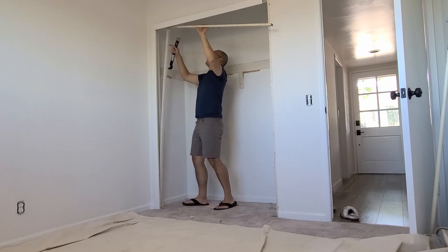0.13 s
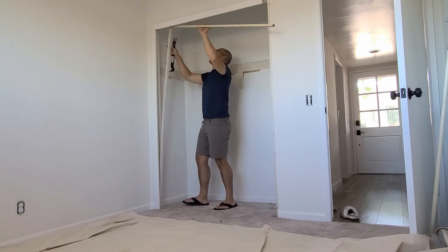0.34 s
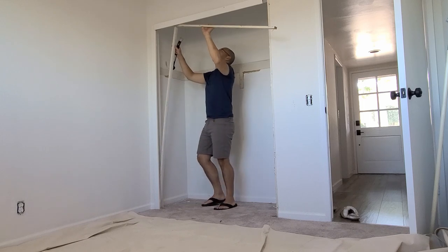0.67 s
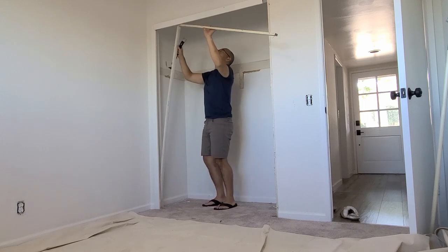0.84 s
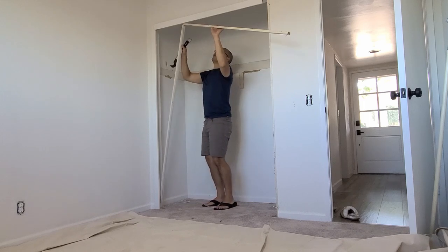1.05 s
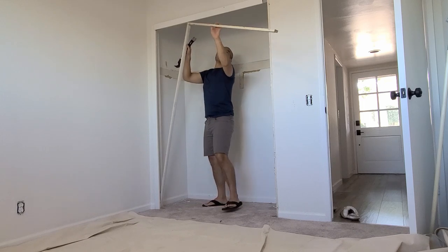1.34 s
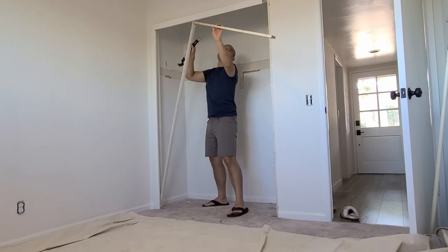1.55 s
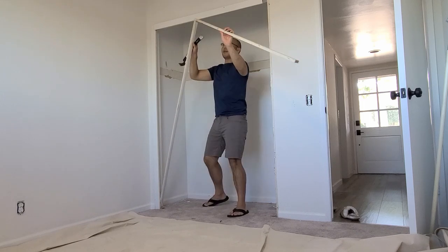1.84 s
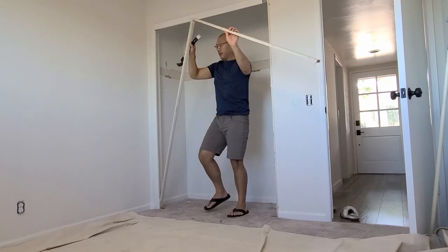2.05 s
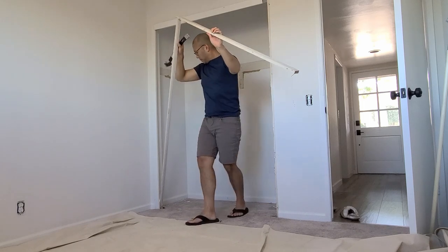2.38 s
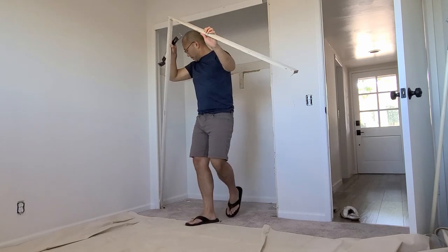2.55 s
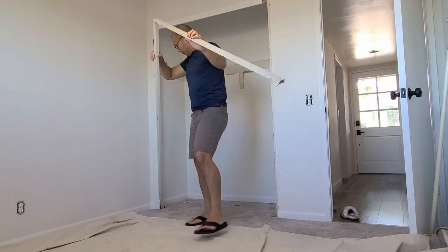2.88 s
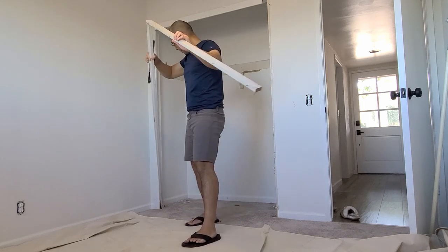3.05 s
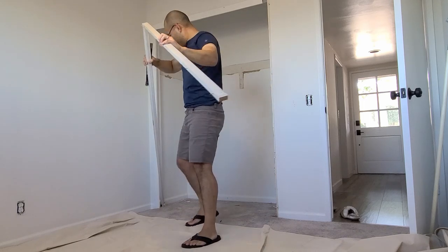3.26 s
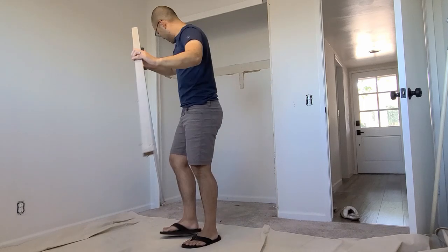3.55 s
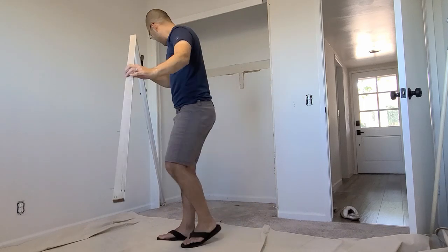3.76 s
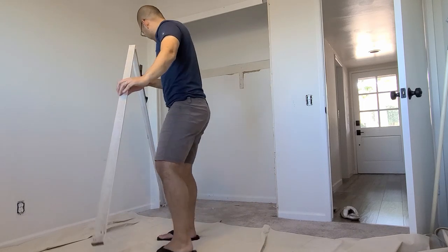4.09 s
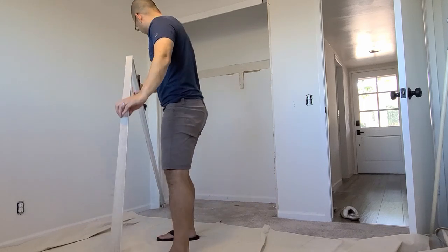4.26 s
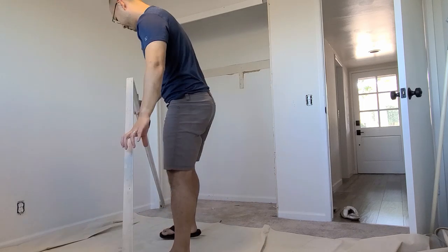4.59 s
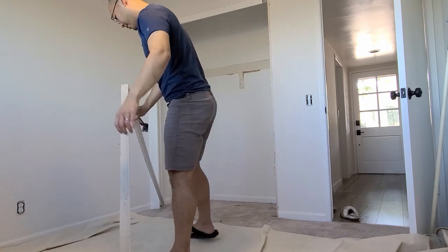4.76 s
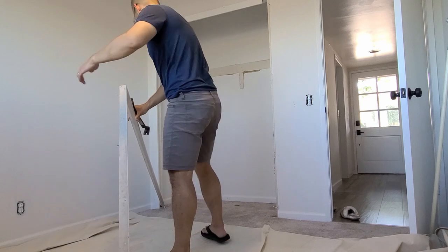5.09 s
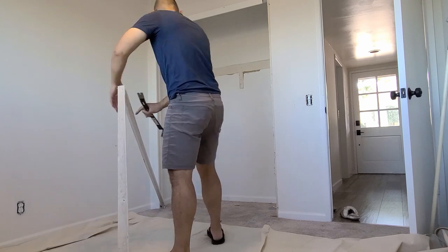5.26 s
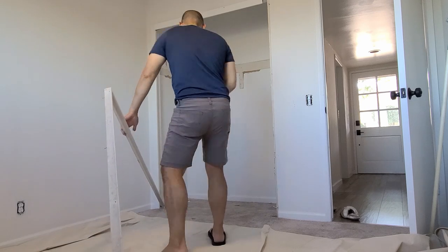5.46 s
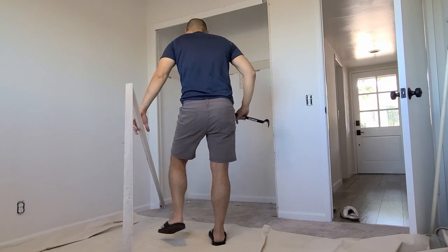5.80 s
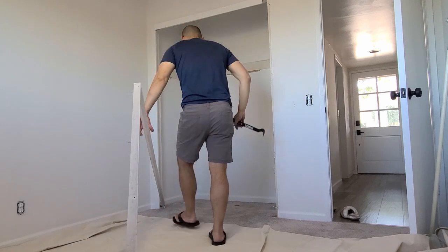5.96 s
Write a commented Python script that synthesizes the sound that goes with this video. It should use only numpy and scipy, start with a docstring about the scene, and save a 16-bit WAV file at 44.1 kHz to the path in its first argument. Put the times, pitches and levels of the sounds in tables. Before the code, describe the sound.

In a bare hard-walled room, a long wooden trim strip is pried free. After a near-quiet moment, bright cracks and scrapes burst out with low hollow wall booms, then faint creaks, a second cluster of snaps and thumps, cloth shuffles, and a solid wooden knock as the board meets the covered floor. A stereo microphone at room distance catches lively reflections, low rumble and slight hiss.

```python
"""Prying trim in a bare room

A long strip of painted wooden trim is worked loose from a hollow wall: paint and nails crack, the strip
knocks and scrapes, the wall booms, feet shuffle on a drop cloth. Runs of tiny slips ring the strip's modes,
pushes ring the wall's modes, and shaped noise makes cloth, house rumble and microphone hiss.
Hard walls put a bright tail on the wood, heard by a stereo microphone."""
import sys
import numpy as np
from scipy import signal
from scipy.fft import rfft, irfft, next_fast_len
from scipy.io import wavfile
from scipy.ndimage import uniform_filter1d, map_coordinates

SR = 44100
rng = np.random.default_rng(int(sys.argv[2]) if len(sys.argv) > 2 else 0)


def gain_from_decibels(decibels):
    """Convert decibel values to linear amplitude factors."""
    exponent = np.asarray(decibels, float) / 20
    return 10 ** exponent


def digitize_waveform(pressure):
    """Quantize a signal to 16-bit integers and store it at the path in sys.argv[1].

    Rows of a 2-D input are taken as channels; values are limited to [-1, 1].
    """
    field = np.atleast_2d(pressure).T
    bounded = np.clip(field, -1, 1)
    quanta = np.round(bounded * 32767).astype(np.int16)
    wavfile.write(sys.argv[1], SR, quanta)


N = 270330  # length in samples

# Microphone noise. Each row: frequency in Hz, relative level in dB per Hz.
HISS_SPECTRUM = [(300, 15), (2000, -11), (8000, -7), (16000, -3)]
# Low rumble of the house. Each row: frequency in Hz, relative level in dB per Hz.
HOUSE_SPECTRUM = [(13, -0.5), (22, 2), (80, 5.5), (93, 5), (103, -1.5), (157, -10.5), (184, -14.5),
                  (227, -4.5), (297, -10.5), (353, -38), (420, -34.5), (550, -47), (920, -120)]
# Grainy rustle of the drop cloth. Each row: frequency in Hz, relative level in dB per Hz.
CLOTH_SPECTRUM = [(180, -29.5), (300, 2), (800, 3), (1900, 1.5), (3400, -4), (7000, -11.5), (16000, -33)]
# Feet shifting on the cloth. Each row: peak time in seconds, rustle level in dB, weight on the floor in dB.
STEPS = [(0, -115, -46), (.3, -78, -61), (1.701, -58.5, -48.5), (2.3, -64, -54), (2.648, -54, -45.5),
         (3.65, -55, -45.5), (4.102, -61, -63.5), (5.149, -64.5, -72), (5.449, -54.5, -45),
         (5.669, -63, -73), (6.12, -71.5, -79)]

# Decay of the bare room. Each row: frequency in Hz, T60 in seconds.
ROOM_DECAY = [(200, 0.83), (1000, 0.41), (3000, 0.43), (7000, 0.36), (15000, 0.22)]
# Likeness of left and right at the microphone. Each row: frequency in Hz, correlation (no unit).
LEFT_RIGHT_LIKENESS = [(60, 0.98), (180, 0.94), (350, 0.75), (700, 0), (2000, 0.1), (10000, 0)]

# Modes of the hollow wall. Each row: frequency in Hz, relative level in dB, undamped T60 in seconds.
WALL_MODES = [(48.93, 3, 1), (56.54, 2, 1), (75.2, 1, 0.79), (86, -4, 0.68), (128, 7, 0.34),
              (157.9, -0.5, 0.55), (198, 1, 0.24), (233.2, 4.5, 0.26), (285.5, 6.5, 0.22),
              (310, -3.5, 0.55)]
# Pushes that shake wall and floor. Each row: start in seconds, level in dB, centre in Hz.
THUMPS = [(0.623, -32, 278), (0.627, -32, 49.6), (.69, -26, 86), (0.71, -26, 198), (0.828, -27.5, 49.3),
          (0.904, -21, 215), (0.927, -13.5, 55.6), (.99, -22, 148), (1.021, -26.5, 51), (1.113, -25.5, 56),
          (1.215, -32.5, 74), (1.269, -25, 50), (1.673, -45.5, 268), (1.913, -29.5, 128), (2.844, -22, 124),
          (2.85, -27.5, 303), (2.932, -17, 68), (3.009, -18, 64.5), (3.062, -27.5, 276), (3.089, -20, 76.4),
          (3.117, -23.5, 137), (3.173, -32.5, 72), (3.261, -36.5, 68.4),]
# The freed strip bumps the floor, deadened by the cloth. Each row: start in seconds, level in dB, centre in Hz.
FLOOR_BUMPS = [(3.598, -40.5, 192), (4.181, -37, 243), (4.566, -23, 91.3), (4.569, -24, 275),
               (4.651, -27.5, 198), (5.371, -60, 79), (5.398, -41, 250)]

# Modes of the wooden strip. Each row: frequency in Hz, width in Hz, relative level in dB.
STRIP_MODES = [(790, 70, 0), (970, 60, 0), (1210, 70, 0), (1340, 60, 0), (1595, 50, 2), (1950, 70, 0),
               (2150, 80, -2), (2400, 140, 0), (2700, 140, 0), (3350, 160, 0), (3900, 200, -1),
               (4700, 260, 0), (5150, 220, -1), (5920, 180, 0), (8800, 160, 0)]
# Brittle snaps of paint and nails. Each row: start in seconds, level in dB, centre in Hz, splinter level in dB.
SNAPS = [(0.407, -54.5, 3080, -16.5), (1.4, -67, 5800, 11.5), (1.473, -48.5, 6240, -11.5),
         (2.598, -46, 3200, -5), (3.169, -22.5, 2534, -21.5), (3.169, -26, 3470, -10.5),
         (4.212, -32, 1145, -17.5)]
# The strip breaks free or knocks against wall and floor.
# Each row: start in seconds, level in dB, centre in Hz, body level in dB, splinter level in dB.
KNOCKS = [(0.03, -51.5, 2300, -7, -21), (0.607, -23, 8960, -21.5, 1.5), (0.613, -28, 2600, -20, -16),
          (0.616, -26.5, 5630, -19.5, -15.5), (0.752, -34, 4950, -7, 5), (0.889, -23.5, 4130, -6, 6),
          (0.905, -27, 1400, -8.5, -35.5), (1.894, -49.5, 4500, 3.5, -3), (1.996, -45, 4270, -8.5, -1.5),
          (2.34, -54, 1170, 13, -3.5), (2.474, -43, 2950, -12, -8.5), (2.82, -22, 1590, -7.5, -28.5),
          (2.826, -27, 1620, -8, -37), (2.886, -32, 3080, -4.5, -10.5), (2.924, -37, 3230, -11.5, -12),
          (3.05, -29, 1190, 6, -8), (3.307, -29.5, 2970, -25, 3), (3.59, -47.5, 1080, 4.5, -26),
          (3.667, -55.5, 1550, -5, -34), (3.815, -57, 1260, -9, -4.5), (4.171, -42, 1285, 4, -25),
          (4.548, -33.5, 1900, -19, -42), (4.557, -17, 2243, -9.5, -18), (4.567, -19, 1440, -1.5, -26),
          (4.651, -22.5, 1270, -19.5, -28.5), (5.076, -54.5, 2170, -11, -21),
          (5.371, -51.5, 1700, -7, -45.5), (5.554, -49, 2350, 10, -5)]
# The strip drags, tears and creaks.
# Each row: start in seconds, level in dB, centre in Hz, splinter level in dB, decay time of the slips in seconds.
RUBS = [(0.562, -56.5, 2900, 3, .012), (0.641, -29.5, 5200, 8, 0.018), (0.834, -45.5, 4700, 10.5, 0.025),
        (1.07, -49, 2550, -21, 0.035), (1.905, -45, 1670, -6, 0.019), (2.628, -51, 730, -68, .04),
        (2.686, -48, 855, -83, .013), (2.706, -58, 1980, -41, .016), (2.765, -47.5, 950, -43, 0.046),
        (3.385, -41, 2040, -28, .024), (4.191, -48, 2560, -1, 0.0057), (3.132, -40.5, 3460, -5, 0.047),
        (5.187, -61.5, 3330, -14, 0.0092), (4.473, -54.5, 2300, -8.5, 0.067), (4.741, -31, 2230, -23, .015),
        (4.838, -47.5, 2600, -7, .015), (5.43, -45.5, 2840, -9, 0.019), (5.614, -50.5, 1830, -12.5, 0.019)]

STEP_RISE_S, STEP_FALL_S = 0.077, 0.19
STILL_RUSTLE_DB, STILL_HOUSE_DB, HISS_DB = -65, -54.5, -70  # levels between steps; the hiss is constant
PUSH_RISE_S = 0.0082
THUMP_REACH_DB, BUMP_REACH_DB = 8.5, 29  # loss of a mode one octave off the centre
THUMP_DAMPED, BUMP_DAMPED = 0.76, 0.49  # share of the free ring time that is left
SNAP_S, KNOCK_S = 0.0011, 0.006  # decay time of the slips
SNAP_BODY_DB, RUB_BODY_DB = -27, -8
SNAP_WET_DB, WET_DB = 2, 11.5  # room over direct sound: snaps are heard drier than knocks and rubs
FOCUS_DB, FOCUS_OCTAVES = 13, 0.07  # lift of the modes near a contact's centre
HUMP_DB, HUMP_OCTAVES = 4, 0.26  # broad lift of everything near it
LOW_CUT_HZ = 33.7
BALANCE_DB = -1.2  # left over right


def unit(x):
    """Scaled to rms 1."""
    return x / np.sqrt(np.mean(x ** 2) + 1e-20)


def along(points, hz):
    """Reads a curve of (Hz, value) points on a log frequency axis."""
    f, value = np.transpose(points)
    return np.interp(np.log(hz + 1), np.log(f + 1), value)


def wobble(rate):
    """A smooth random curve with rate knots a second."""
    knots = rng.standard_normal(int(N * rate / SR) + 4)
    return map_coordinates(knots, [np.arange(N) * rate / SR])


def filtered(x, response):
    """Multiplies the spectrum of x by a complex response of frequency."""
    n = x.shape[-1]
    m = next_fast_len(n + 8192)
    return irfft(rfft(x, m) * response(np.fft.rfftfreq(m, 1 / SR)), m)[..., :n]


def causal(gain):
    """The minimum-phase response with this gain, by folding the cepstrum."""
    cepstrum = irfft(np.log(gain + 1e-6))
    half = len(cepstrum) // 2
    cepstrum[1:half] *= 2
    cepstrum[half + 1:] = 0
    return np.exp(rfft(cepstrum))


def spread(pair):
    """Mixes two unrelated signals into left and right, alike in the bass."""
    def mid_side_gains(hz):
        angle = np.arccos(np.clip(along(LEFT_RIGHT_LIKENESS, hz), -1, 1)) / 2
        return np.array([np.cos(angle), np.sin(angle)])

    mid, side = filtered(pair, mid_side_gains)
    return np.array([mid + side, mid - side])


def rush(spectrum, patchy_db):
    """Stereo noise of rms 1 whose gain varies in random patches of time and frequency."""
    z = signal.stft(rng.standard_normal((2, N)), nperseg=512)[2]
    patches = uniform_filter1d(rng.standard_normal(z.shape[1:]), 6, 0)
    patches = unit(uniform_filter1d(patches, 10, 1))
    pair = signal.istft(z * gain_from_decibels(patchy_db * patches), nperseg=512)[1][:, :N]
    return unit(spread(filtered(pair, lambda hz: gain_from_decibels(along(spectrum, hz)))))


def room(x, wet_db, near_db, gap, left_db):
    """Direct sound, near-corner echoes and a fresh tail in which each frequency dies at its own speed."""
    hz, t, z = signal.stft(rng.standard_normal((2, len(x))), SR, nperseg=256)
    decay = gain_from_decibels(-60 * t / along(ROOM_DECAY, hz)[:, None])
    tail = spread(signal.istft(z * decay, SR, nperseg=256)[1][:, :len(x)])
    t = np.arange(len(x)) / SR
    near_echoes = gain_from_decibels(near_db - 60 * t / 0.1)
    tail *= np.clip(t / gap, 0, 1) * (1 + near_echoes)  # the reflections fade in over the gap
    tail *= gain_from_decibels(wet_db) / np.sqrt(np.mean(np.sum(tail ** 2, 1)))
    tail[0, 10] += 1  # the direct sound reaches the right port first
    tail[1, 0] += 1
    sides = gain_from_decibels([[left_db / 2], [-left_db / 2]])
    return signal.fftconvolve(x[None], tail * sides, axes=1)[:, :len(x)]


def microphone_hiss():
    """Steady noise of the microphone, nearly even in time."""
    return gain_from_decibels(HISS_DB) * rush(HISS_SPECTRUM, patchy_db=0.5)


def step_level(still_db, step_db):
    """Adds the power of the exponential swell of every step to a still level."""
    t = np.arange(N) / SR - np.transpose(STEPS)[0][:, None]
    swell = np.exp(np.where(t < 0, t / STEP_RISE_S, -t / STEP_FALL_S))
    return np.sqrt(gain_from_decibels(still_db) ** 2 + np.sum((gain_from_decibels(step_db)[:, None] * swell) ** 2, 0))


def house_rumble():
    """Low noise of the house that wavers slowly and swells as weight comes onto the floor."""
    weight_db = np.transpose(STEPS)[2]
    house = rush(HOUSE_SPECTRUM, patchy_db=1.2)
    return step_level(STILL_HOUSE_DB, weight_db) * gain_from_decibels(2.65 * wobble(3.5)) * house


def cloth_rustle():
    """Grainy noise of the drop cloth that swells with each step and flickers slowly and quickly."""
    rustle_db = np.transpose(STEPS)[1]
    flicker = gain_from_decibels(0.5 * wobble(1.9) + 0.4 * wobble(60))
    return step_level(STILL_RUSTLE_DB, rustle_db) * flicker * rush(CLOTH_SPECTRUM, patchy_db=2.2)


def wall():
    """Smooth pushes ring the modes near their centre; a hand on the wood, or the cloth, damps them."""
    size = int(1.2 * SR)
    out, t = np.zeros(N + size), np.arange(size) / SR
    pushes = [(*row, THUMP_REACH_DB, THUMP_DAMPED) for row in THUMPS]
    pushes += [(*row, BUMP_REACH_DB, BUMP_DAMPED) for row in FLOOR_BUMPS]
    for start, db, centre_hz, reach_db, damped in pushes:
        ring = np.zeros(size)
        for hz, level, t60 in WALL_MODES:
            mode_db = level - reach_db * np.log2(hz / centre_hz) ** 2
            ring += gain_from_decibels(mode_db - 60 * t / (t60 * damped)) * np.sin(2 * np.pi * hz * t)
        ring *= 1 - np.exp(-t / PUSH_RISE_S)
        out[round(start * SR):][:size] += gain_from_decibels(db) * ring / np.abs(ring).max()
    return out[:N]


def contact(db, centre_hz, body_db, splinter_db, length, wet_db):
    """A run of tiny slips that rings the strip, above all its modes near the contact's centre."""
    size = int(0.7 * SR)
    t = np.arange(size) / SR
    slips = rng.standard_normal(size) * gain_from_decibels(2.97 * rng.standard_normal(size))
    slips *= np.exp(-t / length) * (1 - np.exp(-t / (0.26 * length)))  # long contacts swell, short ones snap
    # the main break stands out of a short run
    slips[round(0.4 * length * SR)] += 14 * min(1, KNOCK_S / length) ** 2

    hz, width, level = np.transpose(STRIP_MODES)[:, :, None]
    focus = np.exp(-(np.log2(hz / centre_hz) / FOCUS_OCTAVES) ** 2)
    level = level + FOCUS_DB * focus - 6
    level = level + 1.5 * rng.standard_normal(hz.shape)  # every contact excites the modes a little differently
    # (Hz, dB per octave)
    shape = [(40, body_db - 31), (120, body_db - 30), (500, body_db), (centre_hz, 0), (11000, splinter_db)]

    def colour(f):
        modes = 1 + np.sum(gain_from_decibels(level) / (1 + (2 * (f - hz) / width) ** 2), 0)
        hump_db = HUMP_DB * np.exp(-(np.log2((f + 1) / centre_hz) / HUMP_OCTAVES) ** 2)
        return causal(gain_from_decibels(along(shape, f) + hump_db) * modes / np.sqrt(f + 50))

    sound = room(filtered(slips, colour), wet_db=wet_db, near_db=-5, gap=0.0027, left_db=2.1)
    loudest = np.sqrt(uniform_filter1d(np.mean(sound ** 2, 0), 400).max())  # short-term rms
    return gain_from_decibels(db) * sound / loudest


def strip():
    """Snaps, knocks and rubs differ in how long the contact lasts and how much of the board's body it moves."""
    out = np.zeros((2, N + SR))
    rows = [(s, db, hz, SNAP_BODY_DB, top, SNAP_S, SNAP_WET_DB) for s, db, hz, top in SNAPS]
    rows += [(*row, KNOCK_S, WET_DB) for row in KNOCKS]
    rows += [(s, db, hz, RUB_BODY_DB, top, length, WET_DB) for s, db, hz, top, length in RUBS]
    for start, *how in rows:
        sound = contact(*how)
        out[:, round(start * SR):][:, :sound.shape[1]] += sound
    return out[:, :N]


def scene():
    """All sources at the microphone."""
    background = microphone_hiss() + house_rumble() + cloth_rustle()
    boom = room(wall(), wet_db=-12, near_db=-10, gap=0.012, left_db=0)
    return background + boom + strip()


def band_limit(x):
    """A steep low-pass at the top of the band."""
    return signal.sosfilt(signal.butter(12, 16810, fs=SR, output="sos"), x)


def record(dry):
    """The microphone loses the deepest bass and its right port is a little more sensitive."""
    low_cut = lambda hz: (1j * hz / (LOW_CUT_HZ + 1j * hz)) ** 2
    balance = gain_from_decibels([[BALANCE_DB / 2], [-BALANCE_DB / 2]])
    return band_limit(filtered(dry, low_cut) * balance)


dry = scene()
out = record(dry)
digitize_waveform(out)
```